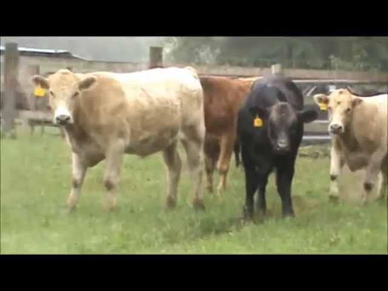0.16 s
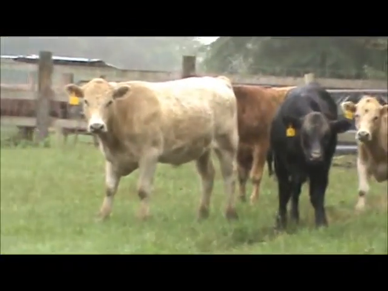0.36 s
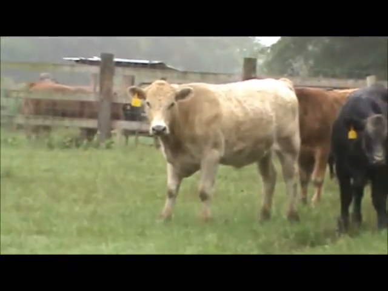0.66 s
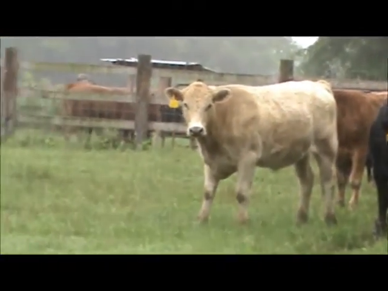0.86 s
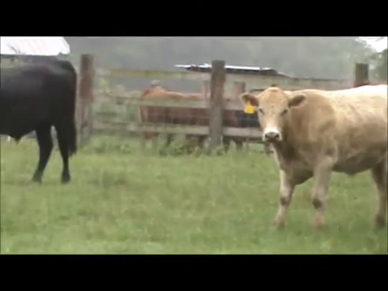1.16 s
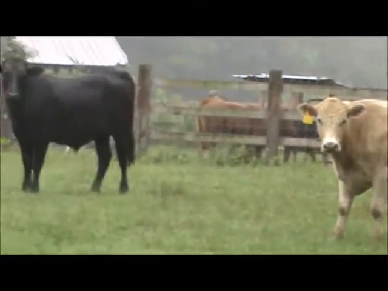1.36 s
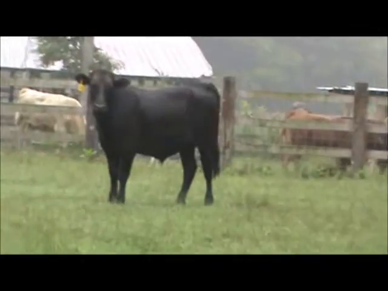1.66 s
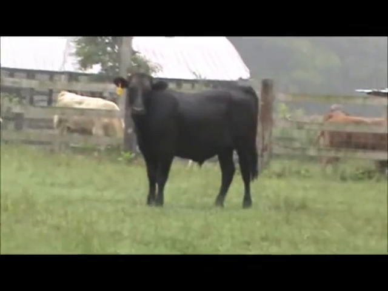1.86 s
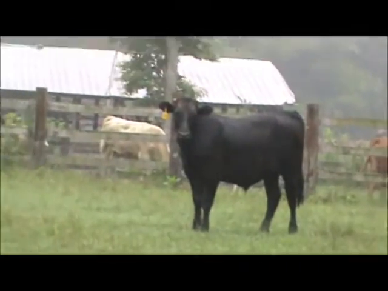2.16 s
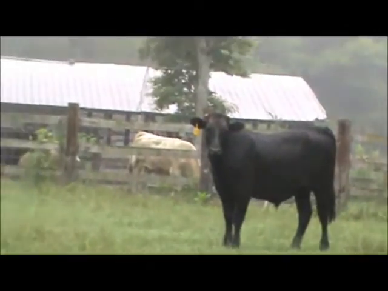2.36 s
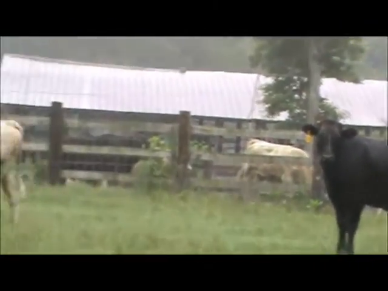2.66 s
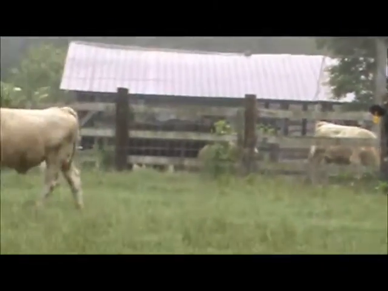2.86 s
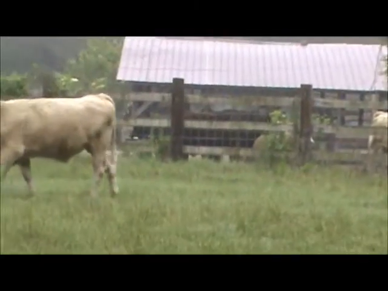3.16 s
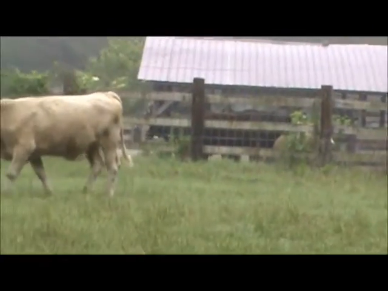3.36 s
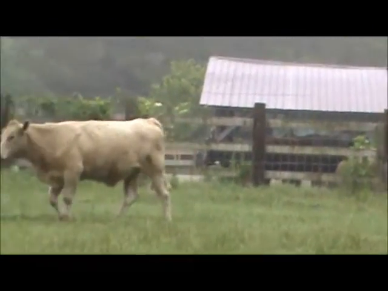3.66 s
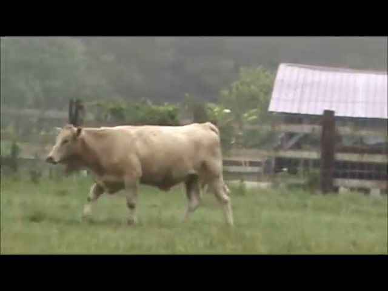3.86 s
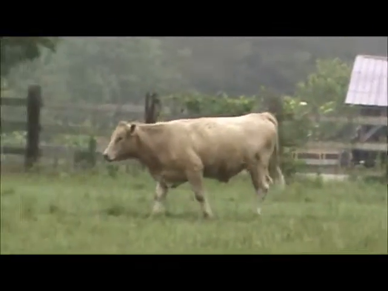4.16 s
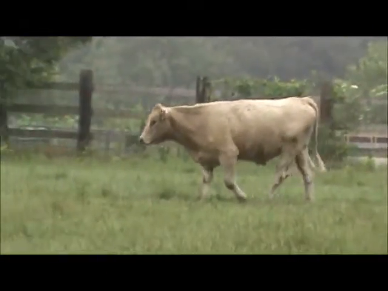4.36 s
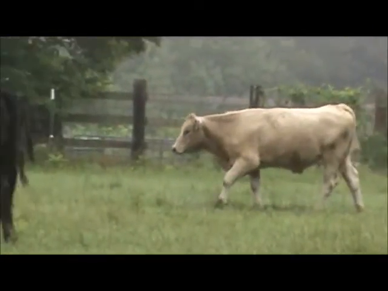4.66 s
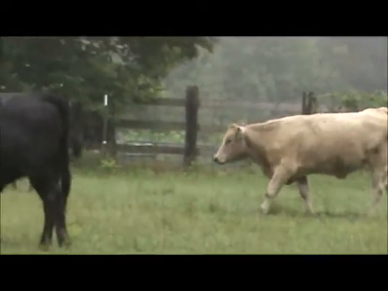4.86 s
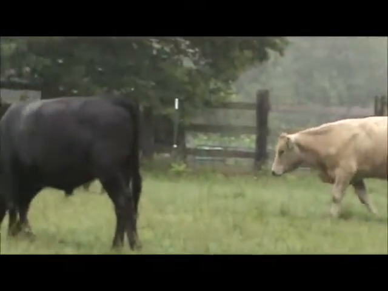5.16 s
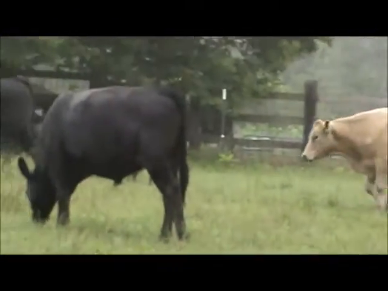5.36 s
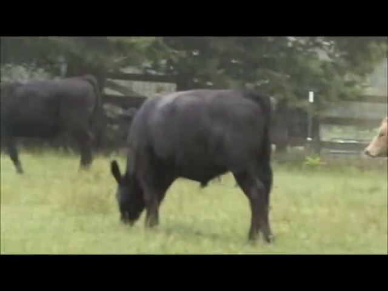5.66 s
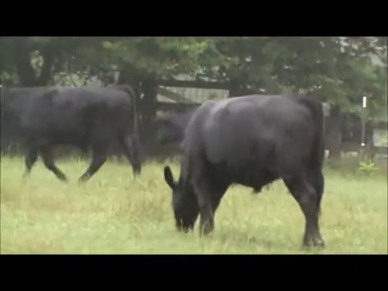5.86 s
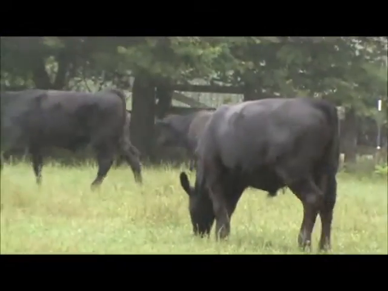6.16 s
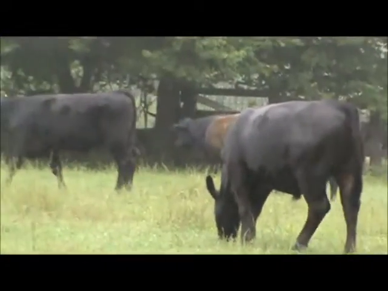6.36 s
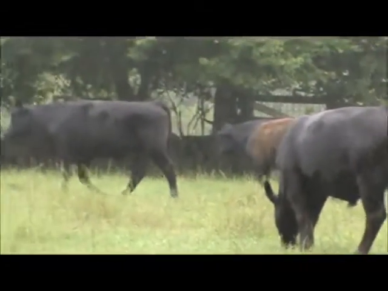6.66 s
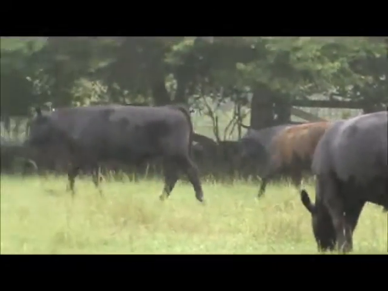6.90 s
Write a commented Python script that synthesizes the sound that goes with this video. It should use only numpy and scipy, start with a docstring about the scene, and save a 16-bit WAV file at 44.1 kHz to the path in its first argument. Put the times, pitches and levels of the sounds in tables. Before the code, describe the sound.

A loud, close cow is already mooing at the start; its pitch falls and it ends by 0.4 seconds, echoing off barns. Two faint bird notes follow around 0.7 and 1 second. From about 1.1 to 2.6 seconds two farther, hoarse cows overlap, the higher one sliding down. At 3 seconds another cow swells and rises, loudest near 3.6, breaks to a lower note and drops away by 4.4, as a soft gust of hiss passes. The pen is then quieter, with dull knocks at about 5.1 and 6.2 seconds and a thin, faint insect trill from 6 seconds. Throughout, a cricket close to the stereo microphone gives very high chirps, nearly four a second, drifting from left toward centre. Underneath are outdoor hiss, sparse dry clicks, the camera's faint ticking buzz and a low distant engine that fades after 4 seconds.

```python
"""Cattle bellow in an open pen, their vocal folds giving a clear tone and their breath a rasp. A near moo
ends and rings off the barns; farther off two cows overlap, then another swells, breaks to a lower note
and drops. Close to the stereo microphone a cricket scrapes its wings in short chirps. Underneath lie a
far engine, a bird, an insect's trill, dull knocks, dry clicks, hiss with one gust, and the buzz of the
camera that houses the microphone."""
import sys
import numpy as np
from scipy import signal
from scipy.fft import rfft, irfft, next_fast_len
from scipy.io import wavfile
from scipy.ndimage import uniform_filter1d

SR = 44100
rng = np.random.default_rng(int(sys.argv[2]) if len(sys.argv) > 2 else 0)


def to_wav(sig):
    """Store sig (one row per channel, or 1-D mono) as 16-bit WAV at the path in sys.argv[1].

    Samples outside -1..1 are clipped; the rate is SR.
    """
    pcm = np.clip(np.atleast_2d(sig), -1, 1) * 32767
    pcm = np.round(pcm).astype(np.int16)
    wavfile.write(sys.argv[1], SR, pcm.T)  # frames by channels


N = 310023
TIME = np.arange(N) / SR

# hiss spectrum: freq_hz, relative_db
AIR_SPECTRUM = [(12, -32.5), (20, -16), (101, 4), (284, -23.5), (375, -9), (1110, -13.5), (1320, -11),
                (1510, -14.5), (2370, -11), (2570, -17), (3500, -17.5), (3910, -19), (15800, -26.5)]
# likeness of left and right hiss: freq_hz, correlation
AIR_LIKENESS = [(60, 1), (150, 0.97), (380, 0.59), (950, -0.3), (2380, -0.3), (5980, 0.15), (15000, 1)]
# phase between the microphone ports: freq_hz, right_lead_rad
PORT_PHASE = [(30, 1), (100, 0), (250, 0.67), (600, 0.52), (1200, 1.06), (4000, 0), (9000, 1.3)]
# far engine: time_s, level_db
ENGINE_LEVEL = [(0, -35), (1.5, -42), (2.15, -39.5), (3.9, -38.5), (4.7, -49.5), (7.03, -50)]
# its resonances: freq_hz, width_hz, relative_db
ENGINE_BODY = [(55.4, 5, -0.5), (104.3, 7, 3), (156.55, 2.6, 5.5), (217, 102, -7.5)]
# camera drive tones: freq_hz, level_db
BUZZ_TONES = [(1310, -55.5), (2385, -46), (3580, -53), (4795, -55), (5975, -82), (7185, -81)]
# gaps in the buzz: start_s, end_s
BUZZ_PAUSES = [(1.43, 1.6), (2.68, 2.8), (2.87, 2.94), (5.2, 5.24), (5.47, 5.54), (5.67, 5.87),
               (6.68, 6.71), (6.74, 6.77), (6.87, 7.0)]
# far bird notes: start_s, length_s, from_hz, to_hz, level_db
TWEETS = [(0.711, 0.081, 2930, 2770, -43), (1.018, 0.049, 2920, 2720, -45), (5.782, 0.012, 3500, 3200, -46)]
# knocks: start_s, relative_db, pitch_hz, t60_s
KNOCKS = [(5.103, -28, 180, .05), (6.155, -32, 1550, .04), (6.203, -20, 100, .08), (6.204, -32, 1650, .04),
          (6.249, -32, 900, .035)]
# cricket chirps: start_s, stroke_count
CHIRPS = [(0.1247, 6), (0.3862, 6), (0.6539, 6), (0.9194, 6), (1.1625, 6), (1.4171, 6), (1.6611, 5),
          (1.9028, 6), (2.147, 6), (2.4087, 6), (2.7316, 6), (3.0115, 6), (3.2876, 6), (3.8119, 8),
          (4.1198, 6), (4.4256, 7), (4.7063, 6), (4.9941, 6), (5.2802, 6), (5.5309, 7), (5.8286, 6),
          (6.0939, 6), (6.3695, 7), (6.6489, 5), (6.9202, 6)]
# the cricket as the camera turns: time_s, pitch_hz, level_db, left_over_right_db
CRICKET_DRIFT = [(0, 8750, -37.5, 12.5), (1, 8755, -35, 9.5), (4.5, 8470, -33, 6), (7, 8400, -34.5, 1)]

# vocal fold pitch of each voice, before any closing fall: time_s, pitch_hz
NEAR_PITCH = [(0, 254.6)]
HIGH_PITCH = [(1.12, 578), (1.25, 545), (1.33, 488), (1.49, 482.7), (1.53, 416), (1.76, 483), (1.95, 489.6),
              (2.3, 428.3), (2.4, 345), (2.46, 284.6), (2.57, 222.4)]
LOW_PITCH = [(2, 341.5)]
SWELL_PITCH = [(2.95, 188.9), (3.26, 195.7), (3.31, 245.1), (3.39, 254.6), (3.43, 286.6), (3.59, 305.5),
               (3.86, 303.6)]
DROP_PITCH = [(3.74, 258.9), (3.98, 266.5), (4.07, 257.1), (4.22, 255.3)]
OVERTONE_PITCH = [(4.21, 258), (4.25, 242.7)]
# effort of each voice, before throat and yard: time_s, clear_db, hoarse_db
NEAR_EFFORT = [(0, -12.5, -31.5), (.255, -12.5, -38.5), (.285, -16, -21), (.33, -23.5, -25), (.4, -46, -36),
               (.46, -68, -44)]
HIGH_EFFORT = [(1.12, -54, -51.5), (1.25, -48, -45.5), (1.38, -39, -46), (1.529, -45, -35.5),
               (1.76, -41, -32), (2.1, -40.5, -30.5), (2.3, -38.5, -36), (2.499, -47, -36.5),
               (2.569, -68, -63)]
LOW_EFFORT = [(1.66, -53, -59), (1.88, -42.5, -48), (2.2, -43, -48), (2.32, -51, -53.5), (2.55, -47, -49.5),
              (2.6, -74, -64)]
SWELL_EFFORT = [(2.95, -50.5, -49.5), (3.221, -46, -49), (3.291, -31.5, -44), (3.51, -31.5, -35),
                (3.6, -23, -35.5), (3.73, -24.5, -26), (3.79, -34, -41), (3.86, -46, -45)]
DROP_EFFORT = [(3.74, -26.5, -40.5), (3.8, -30, -38.5), (4.0, -29, -31.5), (4.12, -29.5, -41),
               (4.26, -27, -34.5), (4.309, -27, -41.5), (4.402, -60.5, -43)]
OVERTONE_EFFORT = [(4.15, -66, -69), (4.19, -30.5, -64), (4.22, -41.5, -64), (4.29, -34.5, -67),
                   (4.33, -63, -70)]
# throat colour of the clear voice: freq_hz, gain_db
NEAR_THROAT = [(255, 0), (510, -10.5), (765, -15), (1020, -1), (1275, -7.5), (1530, -34), (1785, -21.5),
               (2040, -30.5), (2550, -27.5), (2800, -28), (3300, -41), (4100, -44), (4700, -53),
               (5300, -46), (5900, -59), (6500, -46), (7700, -47)]
HIGH_THROAT = [(250, 13.5), (330, 1.5), (480, -10.5), (950, -6.5), (1450, -9.5), (1900, -2), (2900, -19),
               (4000, -53)]
LOW_THROAT = [(342, -34), (684, 2.5), (1030, -24), (1370, -0.5), (1710, -3), (2050, -11), (3000, -25),
              (4000, -35)]
SWELL_THROAT = [(200, 0), (305, 2.5), (500, -26), (750, -10.5), (1000, -36), (1250, -18), (2000, -31),
                (4000, -47)]
DROP_THROAT = [(160, -6.5), (270, -0.5), (350, 1), (430, -9), (520, -10.5), (780, -10), (1040, -15),
               (1300, -18), (1570, -12.5), (1800, -14), (2110, -18), (2550, -30), (3400, -27), (3900, -36),
               (4400, -33), (5000, -44)]
OVERTONE_THROAT = [(1450, -39), (1650, 3.5), (1800, -1), (1950, -10), (2300, -40), (3000, -38), (3400, -32),
                   (3800, -52)]
# head resonances of the hoarse voice: freq_hz, width_hz, relative_db
NEAR_RASP = [(213, 82, 0.5), (596, 230, -2), (1040, 250, -6), (1590, 420, -3.5), (2840, 330, -7),
             (4030, 320, -23), (6500, 4700, -33.5)]
PAIR_RASP = [(860, 300, -10.5), (1430, 33, -61), (1679, 60, 4.5), (1800, 430, -8.5), (2097, 42, 2),
             (2575, 110, -13.5), (2970, 100, -12), (3530, 500, -17.5)]
SWELL_RASP = [(654, 98, 6), (980, 81, 3.5), (1315, 70, 2.5), (1706, 112, 0.5), (2140, 87, -4.5),
              (2960, 520, -14.5)]
DROP_RASP = [(296, 180, -12), (716, 185, -8), (1313, 172, -8.5), (1705, 94, -11.5), (2056, 76, -4),
             (2970, 690, -18)]
# a far moo's lowest tone swells or sinks: centre_s, gain_db, half_width_s
SURGES = [(2.33, -3, 0.053), (2.47, 3.5, 0.035), (3.435, 8.5, 0.026), (3.65, 3.5, 0.12), (3.97, 11, 0.048),
          (4.06, -7, 0.042), (4.12, 8.5, .015), (4.18, -10, 0.041), (4.24, 6.5, 0.021)]

LEAD_S = 1.5  # the near cow has been calling this long at time zero
FALL_SHARE, FALL_S = .51, .075  # out of breath, pitch falls by this share, mostly within this time
BREAK_JITTER = .08  # the slackening folds beat unevenly
MUFFLE_DB = 10.5  # the closing mouth takes this much more from each harmonic above the second
STROKE_S, SAG_HZ_PER_STROKE = .01103, 22  # cricket wings
FRAMES_PER_S, WHINE_HZ, EDGE_HZ = 29.97, 15734, 15900  # camera


def amp(db):
    return 10 ** (np.asarray(db) / 20)


def unit_rms(x):
    return x / np.sqrt(np.mean(x ** 2) + 1e-20)


def curve_at(points, hz):
    """Interpolate a table along log frequency."""
    freqs, values = np.transpose(points)
    return np.interp(np.log(hz + 1), np.log(freqs + 1), values)


def add(mix, start_s, sound):
    part = mix[..., round(start_s * SR):][..., :sound.shape[-1]]
    part += sound[..., :part.shape[-1]]


def wobble(count, span):
    """Random drift of rms 1, smoothed over span samples."""
    return unit_rms(uniform_filter1d(uniform_filter1d(rng.standard_normal(count), span), span))


def resonate(x, modes):
    """Sum of steep resonances, each a pole applied twice; comes out at rms 1."""
    size = next_fast_len(len(x) + 4096)
    hz = np.fft.rfftfreq(size, 1 / SR)
    gain = sum((-1) ** k * amp(db) / (1 + 1j * (hz - centre) / width) ** 2
               for k, (centre, width, db) in enumerate(modes))
    return unit_rms(irfft(rfft(x, size) * gain, size)[:len(x)])


def panned(x, left_over_right_db):
    return x * amp(np.array([[left_over_right_db], [-left_over_right_db]]) / 2)


def mic_ports(x):
    """The two ports differ in phase; a short housing reflection adds to one and takes from the other."""
    size = next_fast_len(x.shape[-1])
    hz = np.fft.rfftfreq(size, 1 / SR)
    echo = .36 * np.exp(-2j * np.pi * (hz - 1480) / 1200)
    echo /= (1 + (550 / (hz + 1)) ** 3) * (1 + (hz / 5000) ** 2)  # mainly the midrange reflects
    turn = np.exp(.5j * curve_at(PORT_PHASE, hz))
    response = np.array([(1 + echo) / turn, (1 - echo) * turn])
    return irfft(rfft(x, size) * response, size)[:, :x.shape[-1]]


def air():
    """Wide outdoor and microphone hiss with drifting patches."""
    frames, hz = N // 256 + 5, np.fft.rfftfreq(1024, 1 / SR)
    left_re, left_im, apart_re, apart_im, patches = rng.standard_normal((frames, 513, 5)).T
    patches = unit_rms(uniform_filter1d(uniform_filter1d(patches, 10, 0), 14, 1))
    likeness = np.clip(curve_at(AIR_LIKENESS, hz), -1, 1)[:, None]
    left, apart = left_re + 1j * left_im, apart_re + 1j * apart_im
    spectra = np.array([left, likeness * left + np.sqrt(1 - likeness ** 2) * apart])
    settling_db = np.linspace(1.5, 0, frames)
    spectra *= amp(curve_at(AIR_SPECTRUM, hz)[:, None] + .54 * patches + settling_db)
    return amp(-43.5) * unit_rms(signal.istft(spectra, nperseg=1024, noverlap=768)[1][:, :N])


def engine():
    """An engine far off: lumpy noise in a few low resonances."""
    lumps = rng.standard_normal(N) * amp(1.5 * wobble(N, span=1200))
    level_db = np.interp(TIME, *np.transpose(ENGINE_LEVEL))
    return mic_ports(amp(level_db) * resonate(lumps, ENGINE_BODY))


def camera():
    """Right at the microphone the drive ticks and buzzes once a frame; the line scan whines on top."""
    frames = np.arange(int(TIME[-1] * FRAMES_PER_S))
    starts = (frames + .33) / FRAMES_PER_S
    spreads = rng.standard_normal((len(frames), 2))
    buzzing = ~np.any([(starts > begin) & (starts < end) for begin, end in BUZZ_PAUSES], axis=0)
    t = np.arange(0, .017, 1 / SR)
    phase_rad = np.array([[-1.], [1.]])  # the housing shakes the two ports out of step
    buzz = sum(np.sqrt(2) * amp(db) * np.sin(2 * np.pi * hz * t + phase_rad) for hz, db in BUZZ_TONES)
    buzz *= signal.windows.tukey(len(t), .35) * amp(-60 * t / .42)
    tick = np.sin(2 * np.pi * 3300 * t + phase_rad) * amp(-60 * t / .014)
    out = np.zeros((2, N))
    for k, start_s, on, (buzz_db, tick_spread) in zip(frames, starts, buzzing, spreads):
        tick_db = -37 - 2.3 * (k % 2) + 2.2 * tick_spread
        add(out, start_s, on * amp(buzz_db) * buzz + amp(tick_db) * tick)
    whine = np.sqrt(2) * amp(-69) * np.sin(2 * np.pi * WHINE_HZ * TIME)
    return out + whine


def crackle(clicks_per_s=4):
    """Rare faint dry clicks at random moments."""
    sizes = amp(-56 + 3 * np.minimum(rng.exponential(1, N), 3))
    impulses = sizes * (rng.random(N) < clicks_per_s / SR)
    t = np.arange(200) / SR
    click = rng.standard_normal(len(t)) * amp(-60 * t / .0022)
    return signal.oaconvolve(impulses, click)[:N]


def gust(peak_s=3.96, peak_db=-45.5, rise_s=.24, fall_s=.37):
    """One gust of grainy, broad hiss near the microphone."""
    grains = rng.standard_normal(N) * amp(1.5 * wobble(N, span=150))
    hiss = resonate(grains, [(4998, 5000, 4), (12200, 4800, 0)])
    width_s = np.where(TIME < peak_s, rise_s, fall_s)
    return amp(peak_db) * np.exp(-((TIME - peak_s) / width_s) ** 2) * hiss


def trill(start_s=5.95):
    """A far insect starts a thin, slightly wavering trill."""
    hz = 7712 + 25 * wobble(N, span=250)
    tone = amp(3 * wobble(N, span=300)) * np.sin(2 * np.pi * np.cumsum(hz) / SR)
    onset = np.clip((TIME - start_s) / .02, 0, 1)
    return panned(amp(-57.5) * tone * onset, 1.4)


def bird():
    """A far bird whistles short falling notes."""
    out = np.zeros(N)
    for start_s, length_s, from_hz, to_hz, db in TWEETS:
        hz = np.linspace(from_hz, to_hz, round(length_s * SR))
        add(out, start_s, amp(db) * np.hanning(len(hz)) * np.sin(2 * np.pi * np.cumsum(hz) / SR))
    return mic_ports(out)


def knocks():
    """Dull knocks of hooves or hands, each a band of noise that dies quickly."""
    out = np.zeros(N)
    t = np.arange(5000) / SR
    for start_s, db, hz, t60_s in KNOCKS:
        ring = resonate(rng.standard_normal(2 * len(t)), [(hz, .25 * hz, 0)])[len(t):]
        attack = np.minimum(t * hz, 1)  # speaks within one cycle
        add(out, start_s, amp(db - 60 * t / t60_s) * attack * ring / 2)
    return mic_ports(out)


def cricket():
    """Close by, to the left: each wing stroke is a sagging tone; a short weak one opens the chirp."""
    out = np.zeros((2, N))
    times, *drift = np.transpose(CRICKET_DRIFT)
    for start_s, strokes in CHIRPS:
        centre_hz, db, pan_db = (np.interp(start_s, times, column) for column in drift)
        for k in range(-1, strokes):
            opening = k < 0
            length_s, late_s = (.0045, .002) if opening else (.0082, 0)
            stroke_db = db + (-4.6 if opening else .38 * rng.standard_normal())
            progress = np.arange(0, 1, 1 / (length_s * SR))
            glide_hz = 330 * (length_s / .0063) * (.5 - progress) - 300 * progress ** 6
            hz = centre_hz - SAG_HZ_PER_STROKE * (k - strokes / 2) + glide_hz
            shape = signal.windows.tukey(len(hz), .35) * (1 - .27 * progress)
            tone = np.sqrt(2) * amp(stroke_db) * shape * np.sin(2 * np.pi * np.cumsum(hz) / SR)
            tone *= 1 + .12 * rng.standard_normal(len(hz))  # the wing's file scrapes a little
            add(out, start_s - .0004 + late_s + k * STROKE_S, panned(tone, pan_db))
    scatter = rng.standard_normal((2, 1800)) * amp(-60 * np.arange(1800) / SR / .083)  # grass and fence
    return out + amp(-16) * signal.oaconvolve(out, scatter / np.linalg.norm(scatter[0]), axes=1)[:, :N]


def yard_echo(x, fence_t60_s=.62, barn_t60_s=2.52):
    """Near fences give a quick tail, barns and trees a long dull one that flutters in the moving air."""
    t = np.arange(2 * SR) / SR
    taps = rng.standard_normal((2, 2, len(t))) * (t > .012)
    taps[:, 1] = .8 * taps[:, 0] + .6 * taps[:, 1]  # the close ports hear nearly the same echoes
    bass_cut = signal.butter(1, 300, "high", fs=SR)  # the quick echo carries little bass
    dull_band = signal.butter(2, [300, 2200], "band", fs=SR, output="sos")
    fence_tail = amp(-60 * t / fence_t60_s) * signal.lfilter(*bass_cut, taps[0])
    barn_tail = amp(-60 * t / barn_t60_s) * signal.sosfilt(dull_band, taps[1])
    at = np.arange(len(x))
    stirred = np.interp(at + 7 * wobble(len(x), span=1100), at, x)  # long paths waver by a few samples
    fences, barns = (signal.fftconvolve(sound[None], tail / np.linalg.norm(tail[0]), axes=1)[:, :len(x)]
                     for sound, tail in ((x, fence_tail), (stirred, barn_tail)))
    return amp(-14) * fences + amp(-27) * barns


def moo(pitch, effort, throat, rasp, jitter, shimmer_db, fall_at_s=np.inf, lead_s=0):
    """Harmonics coloured by the throat, plus breath puffed through the head once a cycle."""
    times, *levels = np.transpose(effort)
    t = np.arange(times[0] - lead_s, times[-1], 1 / SR)
    clear_db, hoarse_db = (np.interp(t, times, column) for column in levels)
    spent = 1 - np.exp(-(np.maximum(t - fall_at_s, 0) / FALL_S) ** 2)  # nears 1 as breath runs out
    hz = np.interp(t, *np.transpose(pitch)) * (1 - FALL_SHARE * spent)
    surge_db = sum(db * np.exp(-((t - at) / width) ** 2) for at, db, width in SURGES)
    hoarseness = np.minimum(amp(hoarse_db - clear_db), 1) ** 2
    unrest = jitter + BREAK_JITTER * spent + .03 * hoarseness
    lead_drift = .006 * wobble(len(t), span=4000) * np.clip((times[0] - t) / .276, 0, 1)
    cycles = np.cumsum(hz * (1 + unrest * wobble(len(t), span=120) + lead_drift)) / SR
    clear = np.zeros(len(t))
    for k in range(1, 31):
        harmonic_db = curve_at(throat, k * hz) + surge_db * (k == 1) - MUFFLE_DB * spent * max(k - 2, 0)
        flicker_db = shimmer_db * min(k / 3, 1) + min(max(k - 5, 0) / 3, 3)
        harmonic_db += flicker_db * wobble(len(t), span=900)
        clear += amp(harmonic_db) * np.cos(2 * np.pi * k * cycles + k * k)
    puffs = (.63 + np.exp(-(cycles % 1) / .32)) * rng.standard_normal(len(t))
    hoarse = resonate(puffs * amp(.83 * wobble(len(t), span=200)), rasp)
    voice = np.sqrt(2) * amp(clear_db) * clear + amp(hoarse_db) * hoarse
    fade = signal.windows.tukey(len(t), .0097 / (t[-1] - t[0]))
    start_s = t[0] + LEAD_S
    return start_s, voice * fade


def cattle():
    """One cow near the microphone, the yard already ringing; the far cows carry more echo."""
    near, far = np.zeros((2, N + round(LEAD_S * SR)))
    add(near, *moo(NEAR_PITCH, NEAR_EFFORT, NEAR_THROAT, NEAR_RASP, jitter=.0023, shimmer_db=.71,
                   fall_at_s=.255, lead_s=LEAD_S))
    # a high and a low cow overlap
    add(far, *moo(HIGH_PITCH, HIGH_EFFORT, HIGH_THROAT, PAIR_RASP, jitter=.012, shimmer_db=4.7))
    add(far, *moo(LOW_PITCH, LOW_EFFORT, LOW_THROAT, PAIR_RASP, jitter=.0039, shimmer_db=2.7))
    # the last cow swells and breaks lower; an overtone stands out as its mouth closes
    add(far, *moo(SWELL_PITCH, SWELL_EFFORT, SWELL_THROAT, SWELL_RASP, jitter=.0095, shimmer_db=2.4))
    add(far, *moo(DROP_PITCH, DROP_EFFORT, DROP_THROAT, DROP_RASP, jitter=.0013, shimmer_db=1.74,
                  fall_at_s=4.225))
    add(far, *moo(OVERTONE_PITCH, OVERTONE_EFFORT, OVERTONE_THROAT, DROP_RASP,
                  jitter=.0018, shimmer_db=2))
    return mic_ports(near + far + yard_echo(near + amp(6) * far))[:, -N:]


def scene():
    """The pen as heard at the camera's microphone."""
    outdoors = cattle() + cricket() + trill() + bird() + knocks() + air() + engine() + gust() + crackle()
    return outdoors + camera()


def record(dry):
    """The recorder cuts off the top of the treble."""
    lowpass = signal.firwin(1023, EDGE_HZ, window=("kaiser", 9), fs=SR)
    return signal.oaconvolve(dry, lowpass[None], "same")


dry = scene()
out = record(dry)
to_wav(out)
```